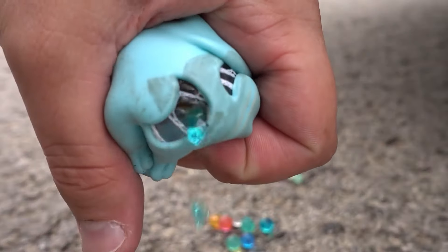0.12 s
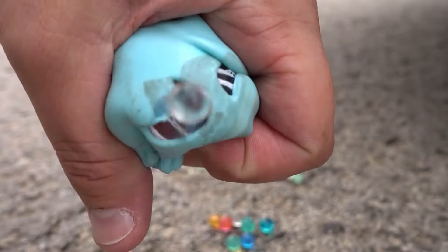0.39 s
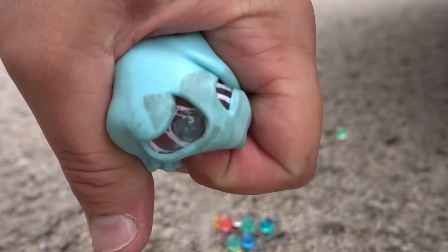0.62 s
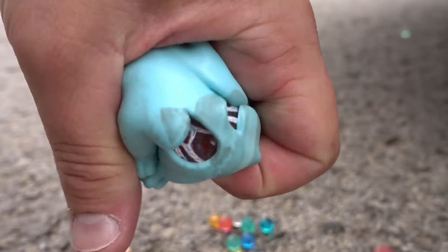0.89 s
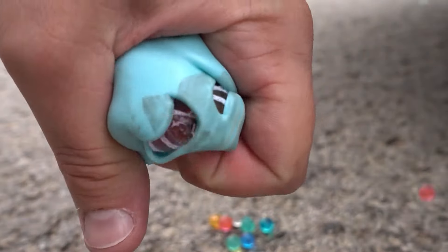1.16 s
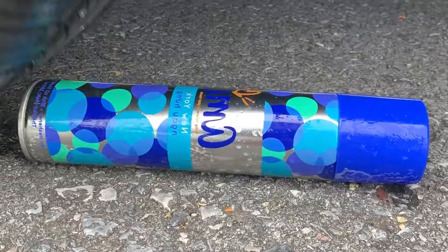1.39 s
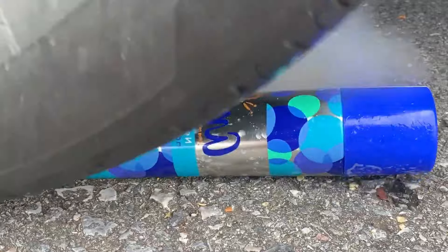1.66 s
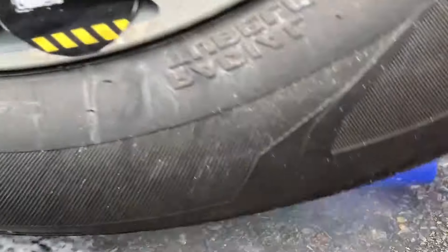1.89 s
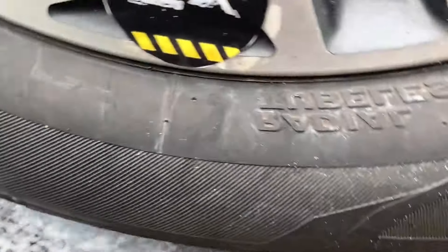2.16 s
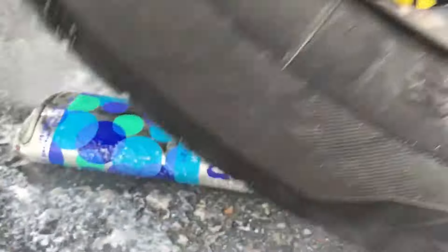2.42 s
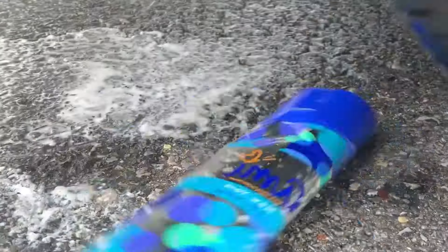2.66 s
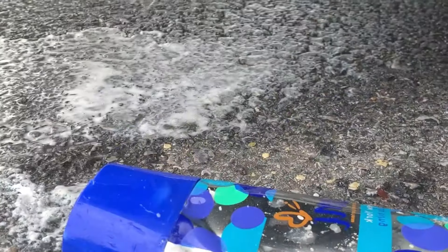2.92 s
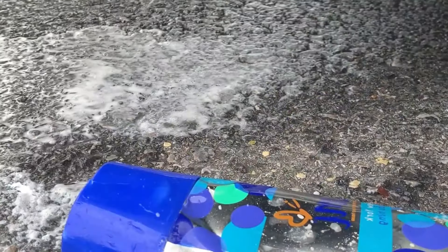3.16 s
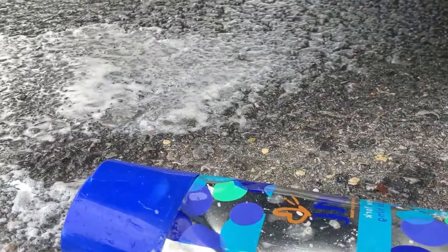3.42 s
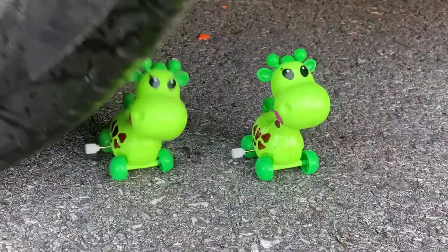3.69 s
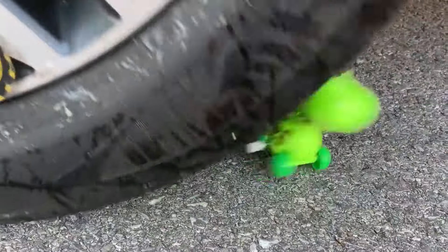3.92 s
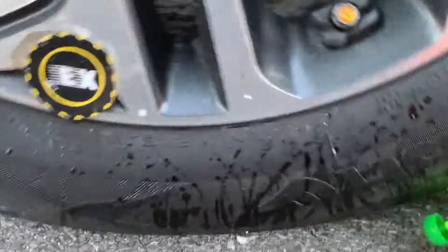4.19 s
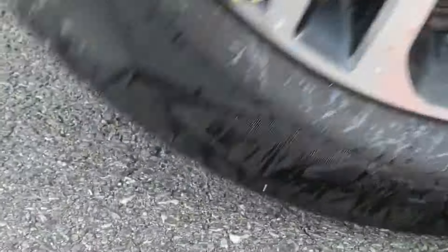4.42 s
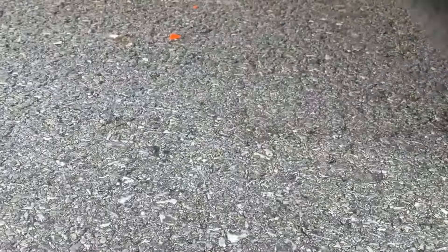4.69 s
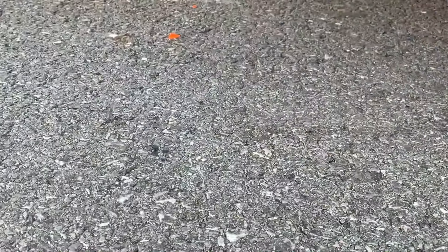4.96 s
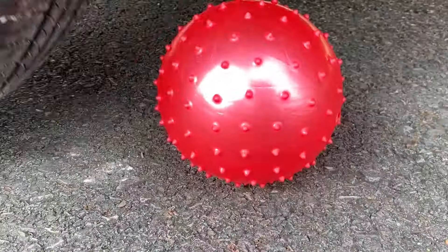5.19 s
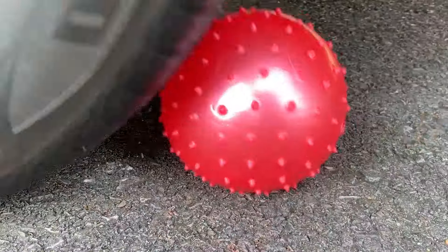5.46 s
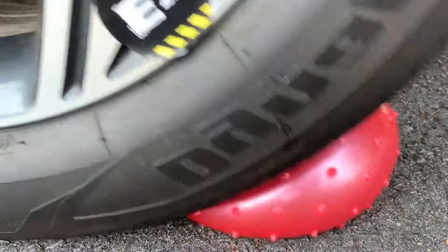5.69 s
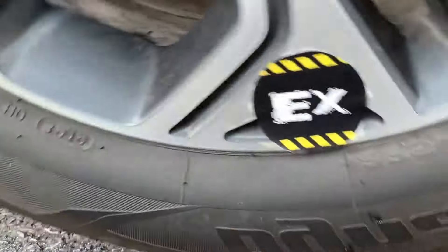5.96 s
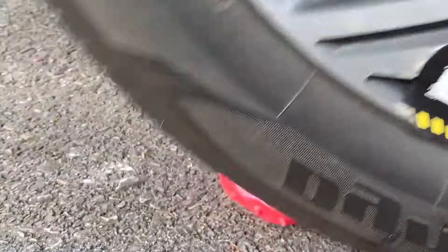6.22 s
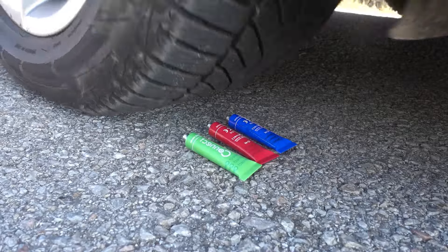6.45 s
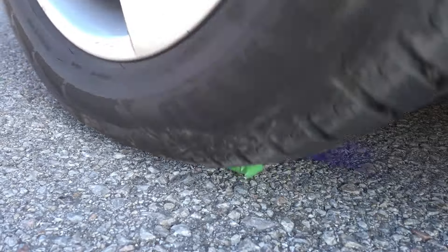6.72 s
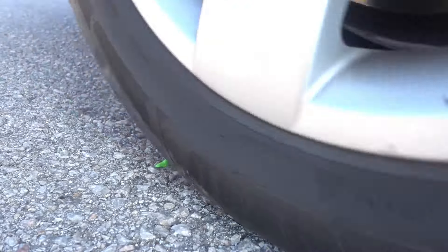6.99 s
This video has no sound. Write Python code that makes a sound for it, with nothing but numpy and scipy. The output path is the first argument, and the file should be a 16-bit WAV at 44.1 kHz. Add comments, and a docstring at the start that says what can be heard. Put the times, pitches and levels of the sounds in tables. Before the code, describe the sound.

Quiet sticky squishes, a loud spray roar with metallic clank, sharp plastic cracking, a dull rubber burst and soft wet squirts under a tyre.

```python
"""Wet gel beads squelch out of a rubber toy squeezed by a fist, then a slow car tyre crushes things close by
outdoors: a spray can (a long jet, then the can skids), plastic toys, a rubber ball and soft tubes.
Crushing is coloured noise with a pitched ring; the jet is roar and hiss that make the can's modes sing; snaps,
clanks and jolts are decaying tones and noise. Two microphone ports hear the bass alike and the treble apart.
At each cut another background begins."""
import sys
import numpy as np
from scipy import signal
from scipy.fft import rfft, irfft
from scipy.io import wavfile
from scipy.ndimage import uniform_filter1d

SR = 44100
rng = np.random.default_rng(int(sys.argv[2]) if len(sys.argv) > 2 else 0)


def decibels_to_gain(level_db):
    """Convert a level in decibels to a linear amplitude gain (20 dB per decade)."""
    exponent = np.asarray(level_db, float) / 20
    return 10 ** exponent


def inscribe(sig):
    """Save sig as 16-bit PCM at rate SR to the path in sys.argv[1].

    A 1-D sig is mono; a 2-D sig holds one channel per row.
    Samples are clipped to [-1, 1] before scaling.
    """
    pcm = np.round(np.clip(np.atleast_2d(sig).T, -1, 1) * 32767)
    wavfile.write(sys.argv[1], SR, pcm.astype(np.int16))


N = 313110  # samples
CAR_START_S, CAR_END_S = 1.6, 6.35  # the span heard with the wider band and the stronger side

# modes of the can wall: pitch_hz, level_db, decay_s (t60); each excitation rescales level and decay
CAN = [(450, -0.5, 0.24), (700, 2.5, 0.14), (933, -1.5, 0.031), (1184, -5.5, 0.25), (1430, -10.5, 0.13),
       (2000, -20, 0.04), (2300, -14.5, 0.1), (3090, -21, 0.05), (3670, -21, 0.06)]


def evened(x):
    """Normalization to unit rms."""
    return x / np.sqrt(np.mean(x ** 2) + 1e-20)


def peaked(x):
    """Normalization to a mid channel of unit peak."""
    return x / abs(x[0]).max()


def read(points, hz):
    """A spectrum interpolated along logarithmic frequency."""
    f, value = np.transpose(points)
    return np.interp(np.log(hz + 1), np.log(f + 1), value)


def shaped(x, spectrum):
    """Linear filtering by a gain curve in the frequency domain."""
    size = x.shape[-1]
    return irfft(rfft(x) * decibels_to_gain(read(spectrum, np.fft.rfftfreq(size, 1 / SR))), size)


def add(mix, s, sound):
    """Superposition of a sound on the mix from time s."""
    part = mix[:, round(s * SR):][:, :sound.shape[-1]]
    part += sound[..., :part.shape[1]]


def resonate(x, hz, width):
    """A one-pole complex resonance, of gain about 1 at hz."""
    r = np.exp(-np.pi * width / SR)
    return 2 * signal.lfilter([1 - r], [1, -r * np.exp(2j * np.pi * hz / SR)], x).real


def follow(x, turn, width):
    """A double-pole resonance at a moving pitch: shift down by turn, low-pass, shift back."""
    r = np.exp(-np.pi * width / SR)
    low = signal.lfilter([1], np.convolve([1, -r], [1, -r]), x / turn)
    return evened((turn * low).real)


def glide(x, hz, width):
    """A steep resonance whose phase integrates the pitch curve hz."""
    return follow(x, np.exp(2j * np.pi * np.cumsum(hz) / SR), width)


def ported(s, mid_side):
    """Two ports hear a common mid and an unrelated side of opposite sign, weighted by pitch and by time s."""
    # side relative to mid: pitch_hz, level_db
    near_side = [(60, -13), (240, -10), (950, -4), (3770, -3), (15000, -3)]
    car_side = [(60, -9), (240, -4), (950, -1), (3770, 0), (15000, -1)]
    side = car_side if CAR_START_S <= s < CAR_END_S else near_side
    mid, apart = mid_side[0], shaped(mid_side[1], side)
    return np.array([mid + apart, mid - apart])


def flicker(x, size, bins, frames, depth_db):
    """Random modulation: smoothed gain patches over time and pitch."""
    z = signal.stft(x, nperseg=size)[2]
    patches = rng.standard_normal(z.shape[1:])
    patches = uniform_filter1d(uniform_filter1d(patches, bins, 0), frames, 1)
    return signal.istft(z * decibels_to_gain(depth_db * evened(patches)), nperseg=size)[1]


def noise(size, spectrum, patchy_db, grain_db):
    """Filtered random noise, mid and side, modulated in narrow rings, broad patches and millisecond grains."""
    x = flicker(rng.standard_normal((2, size + 2048)), size=1024, bins=1, frames=5, depth_db=3.0)
    x = flicker(x, size=256, bins=6, frames=6, depth_db=patchy_db)[:, 1024:size + 1024]
    grains = evened(uniform_filter1d(rng.standard_normal(size), 90))
    x = shaped(x * decibels_to_gain(grain_db * grains), spectrum)
    return x / np.sqrt(np.mean(x[0] ** 2))


def yard(mix):
    """Stationary noise, of rumble, tyre rolling and air, with short fades at the cuts and resonant hums."""
    # backgrounds: start_s, end_s, level_db, spectrum (pitch_hz, density_db per Hz, relative)
    grounds = [(0, 1.405, -62, [(15, -44), (25, -3), (628, -7.5), (713, -0.5), (995, -14), (4170, -15),
               (11300, -23), (14700, -44)]), (1.416, 1.7, -64.5, [(15, -18), (25, -8.5), (229, -17),
               (571, -31), (1190, -33.5), (9000, -51.5), (11700, -87)]), (1.692, 2.968, -43, [(15, -43.5),
               (25, -7), (75, 19), (400, -13), (520, -25), (880, -120)]), (2.972, 3.515, -58, [(15, -43),
               (25, -3), (107, -0.5), (517, -22), (645, -16.5), (786, -28), (4190, -40.5), (9000, -55),
               (11700, -86)]), (3.509, 4.641, -35.5, [(15, -38), (25, 2.5), (129, 1), (297, -21),
               (762, -20.5), (6730, -34.5), (15500, -45)]), (4.64, 5.131, -50, [(15, -34.5), (25, -0.5),
               (173, -8.5), (340, -24), (970, -27.5), (1050, -27.5), (15500, -51)]),
               (5.13, 6.355, -63.5, [(15, -42), (25, -8), (177, -9.5), (356, -18.5), (560, -21), (815, -22),
               (10000, -45), (13000, -85)]), (6.354, 7.101, -54.5, [(15, -40.5), (25, -6), (162, 6),
               (291, -4.5), (525, -3), (2140, -10.5), (11300, -26)])]
    # wavering hums and fuzzy bands: start_s, end_s, pitch_hz, width_hz, level_db (noise lies 6 dB below it)
    hums = [(0, 0.226, 1580, 410, -57), (2.802, 2.96, 556, 260, -37), (2.97, 3.5, 645, 9.5, -77),
            (4.64, 5.131, 174.3, 6, -58), (5.13, 5.847, 179.5, 4.6, -67), (6.875, 7.129, 1483, 320, -40)]
    for t0, t1, db, spectrum in grounds:
        size = round((t1 - t0) * SR)
        fade = signal.windows.tukey(size, 400 / size)
        ground = noise(size, spectrum, patchy_db=1.5, grain_db=0.6)
        add(mix, t0, ported(t0, decibels_to_gain(db) * fade * ground))
    for t0, t1, hz, width, db in hums:
        size = round((t1 - t0) * SR)
        hum = resonate(rng.standard_normal((2, size)), hz, width)
        hum = evened(resonate(hum, hz, width)) / 2
        if width < 10:  # narrow hums hold a steady tone, in the mid alone
            hum[0] += 2 * np.sin(2 * np.pi * hz * np.arange(size) / SR)
        add(mix, t0, ported(t0, decibels_to_gain(db) * hum * signal.windows.tukey(size, .15)))


def echoed(mix):
    """Reverberation: sparse decaying echoes, off ground and car body, by convolution."""
    t = np.arange(0, .12, 1 / SR)
    echoes = rng.standard_normal((2, len(t))) * (rng.random((2, len(t))) < .04)
    echoes = echoes * decibels_to_gain(-60 * t / 0.062) * (t > .002)
    wet = signal.oaconvolve(mix, echoes / np.linalg.norm(echoes[0]), axes=1)[:, :N]
    return mix + decibels_to_gain(-13) * wet


def tyre_air(mix):
    """Cavity resonance: the air inside the tyre rings as one slow-dying tone."""
    # start_s, level_db (peak), pitch_hz, end_s
    rings = [(1.61, -44, 201, 1.7), (2.3, -40, 205.6, 2.6), (4.32, -36, 194, 4.66),
             (5.99, -42, 197.5, 6.345)]
    for s, db, hz, end in rings:
        t = np.arange(0, end - s, 1 / SR)
        decay = decibels_to_gain(db - 60 * t / 1.5)  # t60 of 1.5 s
        add(mix, s, decay * np.sin(2 * np.pi * hz * t) * signal.windows.tukey(len(t), .12))


def jolts(mix):
    """Damped oscillation: dull jolts of the tyre, whose pitch sags to rest, with some rough air."""
    # start_s, level_db (of the push, before onset and decay), pitch_hz (at rest), decay_s (t60)
    pushes = [(2.2655, 1, 240, 0.026), (2.268, -10.5, 86.5, 0.12), (3.735, -14, 132.6, 0.18),
              (3.9, -18, 153, 0.062), (4.017, -13, 364, 0.042), (4.014, -13, 770, 0.024),
              (4.304, -9.5, 240, 0.081), (4.3, -5.5, 738, 0.022), (4.505, -22, 107, 0.068),
              (5.953, -14, 695, 0.08), (5.971, -15.5, 121, 0.087), (5.96, -20, 55.2, 0.18),
              (6.714, -26.5, 300, 0.084), (6.734, -16.5, 263, 0.042), (6.747, -13.5, 238, 0.05),
              (6.762, -24, 208, 0.054), (6.7765, -5.5, 269, 0.037), (6.79, -9, 384, 0.028),
              (6.826, -22.5, 533, 0.05)]
    for s, db, hz, t60 in pushes:
        t = np.arange(0, t60, 1 / SR)
        phase = 2 * np.pi * np.cumsum(hz * (1 + .35 * np.exp(-t / .006))) / SR
        push = np.sin(phase + [[0], [np.pi / 2]])
        rough = evened(resonate(resonate(rng.standard_normal((2, len(t))), hz, hz), hz, hz))
        shape = decibels_to_gain(db - 60 * t / t60) * (1 - np.exp(-t / 0.002))
        add(mix, s, ported(s, shape * (push + 0.35 * rough)))


def squeaks(mix):
    """Narrow-band noise: fuzzy whistles of air past a bead, plastic shards and tread squealing on the road."""
    # start_s, end_s, first_hz, last_hz, breadth_hz (of each pole), level_db
    whistles = [(.772, .818, 7850, 5400, 600, -50), (4.056, 4.095, 9400, 9400, 509, -25),
                (4.352, 4.398, 9500, 9520, 394.4, -30), (7.02, 7.13, 1390, 2000, 300, -49)]
    for t0, t1, first_hz, last_hz, breadth_hz, db in whistles:
        size = round((t1 - t0) * SR)
        x = glide(rng.standard_normal((2, size)), np.linspace(first_hz, last_hz, size), breadth_hz)
        add(mix, t0, ported(t0, decibels_to_gain(db) * x * signal.windows.tukey(size, .6)))


def snaps(mix):
    """Impulsive fracture: each sharp tick is a wide crack and a ring of a few cycles."""
    # break_s, level_db (before the weights of crack and ring), pitch_hz
    ticks = [(0.1187, -23, 11360), (0.2725, -28.5, 9550), (0.3267, -26, 3200), (0.3386, -33, 3160),
             (0.3691, -25, 9100), (0.4675, -29, 9800), (0.4705, -31, 2900), (0.4744, -33, 4230),
             (0.5757, -35, 4460), (0.5891, -33.5, 9500), (1.0885, -33.5, 6500), (1.1378, -24.5, 4100),
             (1.239, -26.5, 5200), (1.26, -32, 3200), (1.3802, -35, 3332), (0.8915, -33, 2350),
             (1.0515, -35, 3870), (2.263, -2.5, 4465), (2.264, -2, 1900), (2.641, -18.5, 2130),
             (2.8085, -32, 4960), (2.905, -35, 3970), (3.788, -1, 9114), (3.8665, -2, 9500),
             (4.0135, -3.5, 8160), (4.049, -13, 2150), (4.0995, -5, 12700), (4.2572, -5.5, 9400),
             (4.302, -3.5, 4813), (4.3035, -7, 1514), (4.356, -13, 9000), (6.634, -25, 910),
             (6.646, -17.5, 1090), (6.815, -25, 1800), (6.8657, -14, 2320), (6.8734, -7.5, 3000),
             (6.888, -14, 3900), (7.0322, -23, 1550)]
    for s, db, hz in ticks:
        t = np.arange(-.002, .01, 1 / SR)
        shape = decibels_to_gain(-60 * np.maximum(t / 0.0043, -t / 0.0025))  # a quick tearing leads up to the break
        crack = peaked(resonate(rng.standard_normal((2, len(t))), hz, 4500) * shape)
        ring = np.sin(2 * np.pi * hz * t + [[0], [np.pi / 2]]) * shape
        add(mix, s + t[0], ported(s, decibels_to_gain(db) * (0.57 * crack + 0.89 * ring)))


def clanks(mix):
    """Modal excitation: a rough blow knocks the struck patch and rings the can's nearest modes most."""
    # start_s, level_db (before the weights of the parts), pitch_hz (of the struck patch)
    blows = [(2.263, -1.5, 800), (2.6395, -11.5, 684), (2.66, -26, 720), (2.8075, -21.5, 2840),
             (2.855, -29, 1480), (2.905, -25, 1420)]
    for s, db, near_hz in blows:
        t = np.arange(0, .15, 1 / SR)
        start = 1 - np.exp(-t / .0008)
        blow = rng.standard_normal((2, len(t))) * decibels_to_gain(-60 * t / 0.022) * start
        rings = 0
        for hz, mode_db, t60 in CAN:
            # half the mode's level in dB, 20 dB less per octave of distance, 0.32 of its decay
            ring_db = mode_db / 2 - 20 * abs(np.log2(hz / near_hz)) - 60 * t / (0.32 * t60)
            rings = rings + decibels_to_gain(ring_db) * np.sin(2 * np.pi * (hz * t + rng.random((2, 1))))
        patch = resonate(resonate(blow, near_hz, .4 * near_hz), near_hz, .6 * near_hz)
        crack = resonate(blow, 2400, 3000)
        x = 0.4 * peaked(rings * start) + 0.6 * peaked(patch) + decibels_to_gain(-13) * peaked(crack)
        add(mix, s, ported(s, decibels_to_gain(db) * x))


def crush(mix, bursts, colour, way):
    """Crackling noise with sparse splinters, part of it ringing at a sagging cavity pitch and its octave.

    bursts: full_s, level_db, rise_s, length_s (scaled by way), pitch_hz (at full level)
    colour: pitch_hz, density_db (per Hz, relative)
    way: ring share, octave share, pole breadth / pitch, grain_db, hold / length, fall t60 / length"""
    ring, octave, breadth, grain_db, hold_share, fall_share = way
    for s, db, rise, length, hz in bursts:
        hold, t60 = hold_share * length, fall_share * length
        t = np.arange(-rise, hold + t60, 1 / SR)
        x = noise(len(t), colour, patchy_db=3.5, grain_db=grain_db)
        splinters = rng.exponential(1, len(t)) * (rng.random(len(t)) < 250. / SR)  # 250 per second
        x = x * (1 + .12 * grain_db * np.convolve(splinters, np.hanning(44), "same"))
        turn = np.exp(2j * np.pi * np.cumsum(hz * np.exp(-1.5 * t)) / SR)  # the cavity slackens as it empties
        rung = ring * follow(x, turn, breadth * hz)
        if hz < SR / 10:
            rung = rung + octave * follow(x, turn ** 2, breadth * hz)
        x = evened(x + rung)
        rise_db = 50 * np.log10(1 + np.minimum(t / rise, 0) + 1e-3)
        fall_db = -60 * np.maximum(t - hold, 0) / t60
        add(mix, s - rise, ported(s, decibels_to_gain(db + rise_db + fall_db) * x))


def gel_squelches(mix):
    """Cavity-coloured noise: gel beads squeezed out of the wet toy (columns as in crush)."""
    squelches = [(.098, -44.5, 0.03, 0.049, 1940), (.217, -42.5, 0.002, 0.005, 3600),
                 (.264, -39.5, 0.0067, 0.02, 2100), (.328, -41, .018, .03, 2660),
                 (.37, -43.5, 0.0048, 0.0078, 9900), (.44, -53.5, 0.0054, 0.055, 4100),
                 (.468, -43, 0.0027, 0.012, 3660), (.505, -41.5, 0.039, 0.043, 10300),
                 (.585, -51, 0.028, 0.02, 5070), (.79, -59, 0.044, 0.18, 7200),
                 (.9, -43.5, 0.021, 0.058, 2110), (.95, -50.5, 0.017, 0.021, 4450),
                 (1.045, -45.5, 0.019, 0.091, 2010), (1.09, -52, 0.011, 0.023, 6460),
                 (1.11, -44.5, 0.0071, 0.018, 5860), (1.134, -40, 0.0043, 0.0084, 2030),
                 (1.165, -48, 0.012, 0.044, 3550), (1.225, -48.5, 0.027, 0.045, 5600),
                 (1.36, -47.5, 0.011, 0.035, 3080)]
    gel = [(410, -13), (700, -33), (1140, -15), (3140, 1), (5750, -7.5), (11300, -12.5)]
    gel_way = (0.77, 0.48, 0.66, 2.4, .4, 1.9)
    crush(mix, squelches, gel, gel_way)


def plastic_crunches(mix):
    """Fracture noise with a narrow resonance: plastic toys ring about one pitch (columns as in crush)."""
    # without the pitch column
    crunches = [(3.75, -19.5, .02, 0.075), (3.787, -14, .014, 0.009), (3.81, -14.5, 0.02, .036),
                (3.865, -18.5, 0.0025, 0.014), (3.89, -15.5, 0.038, 0.031), (3.978, -30, .0056, .047),
                (4.014, -15.5, .005, 0.016), (4.025, -25.5, .006, .06), (4.049, -16, .004, .014),
                (4.062, -21, .008, 0.025), (4.099, -17.5, 0.0033, 0.014), (4.111, -28.5, .0086, .12),
                (4.221, -20, .01, .02), (4.271, -23, .016, .06), (4.301, -10, 0.0068, .02),
                (4.32, -20, .01, .075), (4.355, -27, .0032, 0.081), (4.432, -27.5, 0.033, .036),
                (4.476, -36, 0.017, 0.028), (4.522, -21, 0.029, 0.095), (4.595, -20.5, 0.061, 0.034),
                (4.65, -47, 0.0036, 0.0068)]
    plastic = [(180, -30.5), (300, -8), (632, -7), (1550, -6.5), (2300, -10.5), (9090, -4), (15700, -7.5)]
    plastic_way = (0.067, 0, 0.038, 0.81, .35, 1.9)
    crush(mix, [crunch + (9400,) for crunch in crunches], plastic, plastic_way)


def rubber_bursts(mix):
    """Damped broad resonance: the tread scuffs against the can and the ball bursts (columns as in crush)."""
    scuffs = [(1.485, -63, 0.0072, .022, 1300), (1.578, -32, .035, .035, 438)]
    ball = [(5.958, -12.5, .04, .036, 660), (6.0, -38, .011, 0.051, 454)]
    rubber = [(35, -38.5), (60, 7), (266, -8), (688, -11), (869, -15), (1260, -7.5), (15500, -37.5)]
    tread_way = (9, -3, 2, 0.5, 0.53, 1.3)
    ball_way = (0.71, 0.09, 1.24, 1.1, 0.37, 1.9)
    crush(mix, scuffs, rubber, tread_way)
    crush(mix, ball, rubber, ball_way)


def tube_squirts(mix):
    """Broadly resonant noise: soft tubes squirt under the tyre (columns as in crush)."""
    squirts = [(6.365, -52.5, 0.0044, 0.027, 3970), (6.412, -54, 0.016, 0.02, 9400),
               (6.63, -36.5, 0.006, 0.1, 880), (6.718, -37, 0.0088, 0.11, 1040),
               (6.778, -32, 0.0059, 0.052, 1540), (6.812, -23, 0.021, 0.052, 9900),
               (6.87, -32.5, .02, 0.046, 3700), (6.91, -41.5, .017, .2, 2180), (7.01, -34, .02, 0.21, 1460)]
    tube = [(180, -11.5), (300, -7.5), (534, -7.5), (805, -14.5), (9710, -22), (11300, -18.5)]
    tube_way = (1.4, 0.28, 1.67, 1.13, .4, 1.8)
    crush(mix, squirts, tube, tube_way)


def jet(mix):
    """Turbulent jet noise: gas and liquid tear out of the split can, which skids off as its wall modes sing."""
    # colours of roar and hiss: pitch_hz, density_db (per Hz, relative)
    dull = [(88, -45), (190, -13.5), (666, -5.5), (1000, -10.5), (1190, -9.5), (1370, -8), (9000, -35),
            (11700, -63)]
    bright = [(470, -41.5), (800, -5.5), (976, -4), (1450, -12.5), (2000, 3), (10700, -8.5), (15500, -22.5)]
    # the can skids away: time_s, level_db
    skid = [(2.62, -66), (2.7, -35), (2.77, -32), (2.81, -41.5), (2.84, -47.5), (2.941, -50.5),
            (2.975, -56.5)]
    # the gap under the rolling tread changes, so the body of the jet drifts: time_s, pitch_hz, level_db
    gush = [(1.721, 664, -15.5), (1.77, 837, -18.5), (1.82, 1388, -31), (1.9, 1965, -30.5),
            (1.96, 1050, -27), (2.02, 1400, -25), (2.1, 939, -28), (2.2, 1097, -44.5)]
    open_s, rise_s, choke_s, choke_span_s, empty_s, empty_span_s = 1.723, .038, 2.356, 0.03, 2.754, 0.23
    hiss_lead_s = 0.038  # the hiss starts to choke ahead of the roar
    t = np.arange(open_s - rise_s, skid[-1][0], 1 / SR)

    def ramp(s, span):
        return np.clip((t - s) / span, 0, 1)

    # it opens fast, the tyre chokes it and it sags at 15.5 dB/s, then the can runs empty
    valve_db = -44 * (1 - ramp(t[0], rise_s)) - 30 * ramp(empty_s, empty_span_s)
    valve_db = valve_db - 15.5 * np.maximum(t - choke_s, 0)
    age = np.maximum(t - open_s, 0)
    # the roar sags as the pressure falls, the hiss grows
    roar_db = valve_db - 13.5 - 14.5 * (1 - np.exp(-age / 0.25)) - 13.5 * ramp(choke_s, choke_span_s)
    hiss_choke = ramp(choke_s - hiss_lead_s, choke_span_s + hiss_lead_s)
    hiss_db = valve_db - 26.5 - 3 * np.exp(-age / 0.14) - 9.5 * hiss_choke
    skid_db = np.interp(t, *np.transpose(skid), left=-120)
    roar = noise(len(t), dull, patchy_db=2.4, grain_db=0.5)
    hiss = noise(len(t), bright, patchy_db=2.4, grain_db=0.5)
    x = np.hypot(decibels_to_gain(roar_db), decibels_to_gain(skid_db)) * roar + decibels_to_gain(hiss_db) * hiss

    at, gap_hz, gush_db = np.transpose(gush)
    spits = noise(len(t), dull, patchy_db=2.5, grain_db=3.0)
    body = glide(spits, np.interp(t, at, gap_hz), 700.0)
    x = x + decibels_to_gain(valve_db + np.interp(t, at, gush_db)) * body

    # the walls sing loudest about 1.9 s, while the tread has lifted off them
    sing = .3 + np.exp(-((t - 1.9) / 0.12) ** 2)
    walls = 0
    for hz, mode_db, t60 in CAN:
        fitful_db = 5.0 * evened(uniform_filter1d(rng.standard_normal(len(t)), size=2500))  # comes and goes
        mode = resonate(x, hz, 2 / t60) * (hz / 1000) ** 2
        walls = walls + decibels_to_gain(mode_db + fitful_db) * mode
    add(mix, t[0], ported(open_s, x + sing * walls))


def scene():
    """Superposition of all events, their echoes, then the backgrounds."""
    mix = np.zeros((2, N))
    for source in (tyre_air, jolts, squeaks, snaps, clanks, gel_squelches, plastic_crunches,
                   rubber_bursts, tube_squirts, jet):
        source(mix)
    mix = echoed(mix)
    yard(mix)
    return mix


def low_pass(x):
    """Removes everything above the highest recorded frequency."""
    return signal.sosfilt(signal.butter(12, 16410, fs=SR, output="sos"), x)


def record(dry):
    """Band limitation, narrower before and after the car span, and clipping of the loudest blows."""
    def low_passed(edge_hz):
        taps = signal.firwin(301, edge_hz, window=("kaiser", 8), fs=SR)
        return signal.oaconvolve(dry, taps[None], "same")

    t = np.arange(N) / SR
    in_car_span = (t >= CAR_START_S) & (t < CAR_END_S)
    mix = np.where(in_car_span, low_passed(15500), low_passed(11120))
    return low_pass(np.clip(mix, -1, 1))


dry = scene()
out = record(dry)
inscribe(out)
```